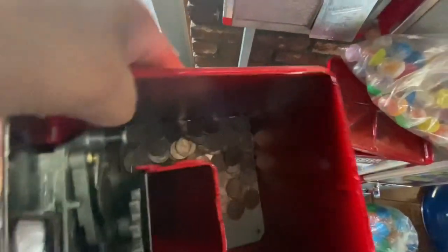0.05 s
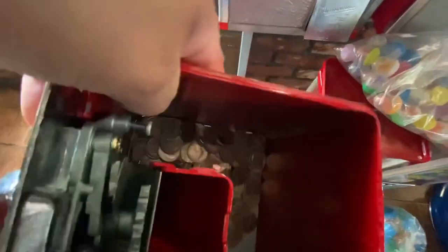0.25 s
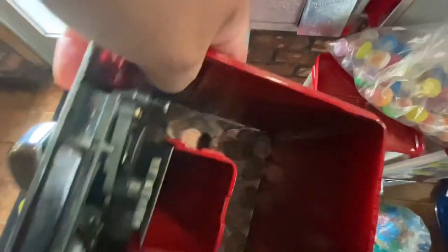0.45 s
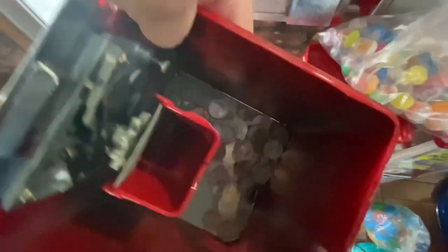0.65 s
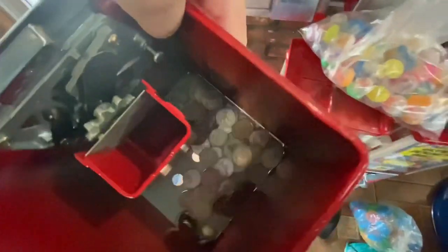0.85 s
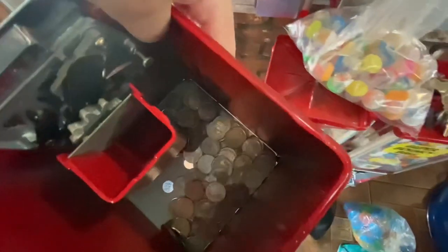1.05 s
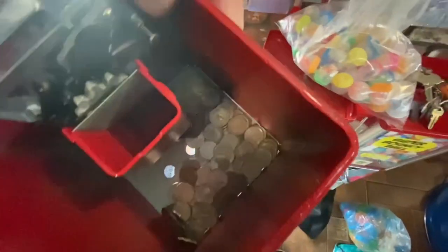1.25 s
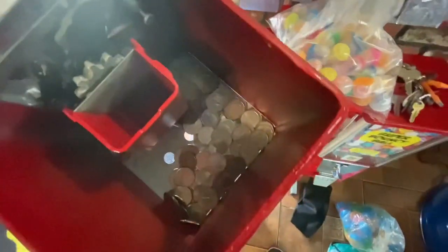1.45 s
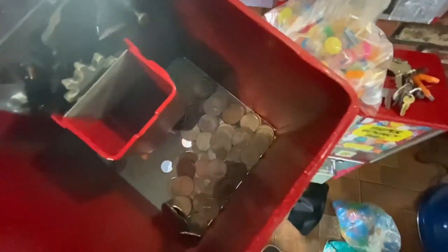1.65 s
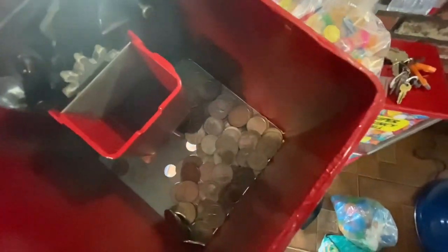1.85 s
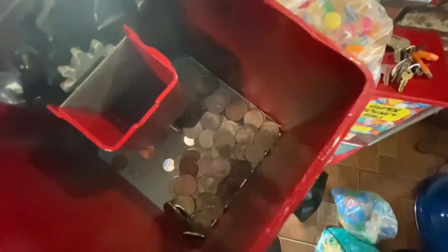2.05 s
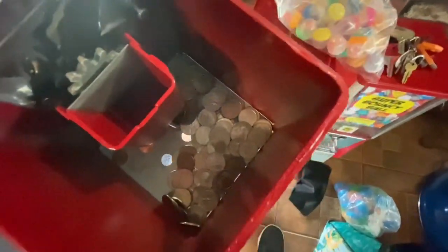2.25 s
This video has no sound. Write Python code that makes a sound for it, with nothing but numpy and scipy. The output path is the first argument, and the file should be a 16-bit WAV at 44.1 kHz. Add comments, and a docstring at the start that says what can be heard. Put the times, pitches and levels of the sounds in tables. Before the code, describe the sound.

Loose coins slide and jingle inside a tilted vending machine, then settle.

```python
"""A quiet, humming shop, close to a small vending machine that is being tilted.
Loose coins slide over its metal floor: many tiny touches blur into a scrape and a jingle.
They drop against the walls in quick knocks that ring the metal and boom in the plastic housing.
The coins settle after about a second, leaving the hum and a very faint, high rustle."""
import sys
import numpy as np
from scipy import signal
from scipy.fft import rfft, irfft
from scipy.io import wavfile

SR = 44100
rng = np.random.default_rng(int(sys.argv[2]) if len(sys.argv) > 2 else 0)


def wav_record(signal):
    """Record a signal, one row per channel, as 16-bit PCM in the file named by sys.argv[1]."""
    frames = np.transpose(np.atleast_2d(signal))
    bounded = np.clip(frames, -1, 1)
    # unit amplitude maps onto the largest positive 16-bit level
    quanta = np.round(bounded * 32767).astype(np.int16)
    wavfile.write(sys.argv[1], SR, quanta)


N = 101429

# tones of the appliance hum: pitch_hz, level_db
HUM_TONES = [(59.2, -53), (150.7, -66), (258.4, -66.5)]
# how the hum swells and dips: time_s, gain_db
HUM_SWELL = [(0, 4.5), (.4, 5), (.62, -3), (.8, -10), (.95, 0), (1.9, 3.5), (2.3, -2.5)]
# tone colour of the shop's dull noise: pitch_hz, gain_db
AIR_COLOUR = [(15, -34.5), (25, -8.5), (63, -3), (82, -6), (114, -14), (157, -13.5), (200, -13.5),
              (256, -10.5), (326, -17.5), (677, -18.5), (1040, -28), (2690, -35), (5570, -48),
              (6560, -46), (16000, -68)]
# how that noise swells and dips: time_s, gain_db
AIR_SWELL = [(0, 4.5), (.4, 4.5), (.7, -5.5), (1.0, 1), (1.3, 0), (1.55, 2), (1.8, 0.5), (2.05, 2),
             (2.3, 1)]
# how alike the background is on the left and right: pitch_hz, likeness_0_to_1
AIR_LIKENESS = [(50, 0.78), (200, 0.65), (600, 0.19), (1500, 0.199), (16000, .1)]
# loudness of the rustle: time_s, level_db
RUSTLE_LEVEL = [(1.2, -105), (1.42, -102), (1.52, -87.5), (1.62, -100), (1.88, -102), (1.98, -78.5),
                (2.1, -80), (2.3, -84)]
# tone colour of the rustle: pitch_hz, gain_db
RUSTLE_COLOUR = [(3000, -20), (4500, -10), (6700, -4.5), (7800, -11), (8900, 3.5), (9600, -5.5), (10800, 2),
                 (12500, -16), (16000, -28.5)]
# the room's echo (a fade is the time to drop by 60 dB): pitch_hz, fade_s
ROOM_FADE = [(100, .35), (500, .34), (3000, .3), (8000, .2), (16000, 0.074)]
# how much louder the coins are on the left: pitch_hz, left_minus_right_db
LEFT_LOUDER = [(100, 4), (400, 12.5), (650, 1), (1100, 7), (2200, -3), (3100, 4), (5200, 0), (7000, 3),
               (9600, -4.5), (12000, 0.5), (15000, 0)]
# how far the left wave runs ahead of the right: pitch_hz, lead_radians
LEFT_LEAD = [(0, 0), (420, .6), (700, 1.4), (1000, 3), (1900, 3.9), (2300, 6.4), (3200, 8.1), (3800, 11),
             (5050, 13.6), (5800, 17.6), (7300, 20.2), (10000, 19), (11700, 18.7), (12900, 15.7),
             (14000, 15.7), (15000, 19)]
# low tones of the plastic housing: pitch_hz, gain_db, fade_s
HOUSING_TONES = [(439.4, -5, 0.044), (540, -23.5, .04), (544.7, -0.5, 0.037), (612, -5.5, 0.015),
                 (666, 0.5, 0.028), (693, -12.5, .035), (1158, -5.5, 0.05)]
# rings of the metal floor and inner parts: pitch_hz, width_hz, gain_db
FLOOR_RINGS = [(1160, 60, 3), (1570, 90, 0), (1820, 50, 0), (2090, 90, 3), (2480, 60, 0), (2895, 50, 6),
               (3088, 45, 7), (3252, 28, 11), (3820, 60, 1), (4128, 35, 8), (4272, 30, 5), (4372, 25, 7),
               (4550, 70, 3), (4955, 55, 13), (5075, 55, 11), (5680, 70, 8), (5790, 50, 4), (6340, 60, 3),
               (7243, 35, 11), (7870, 70, 2), (8160, 40, 2), (9805, 40, 4), (10264, 40, 5), (10400, 50, 3),
               (10970, 40, 3), (12620, 35, 5), (15235, 40, 2)]
# tones of a ringing coin: pitch_hz, gain_db, fade_s
COIN_TONES = [(9200, -17, .12), (9590, -11.5, 0.052), (10260, -1.5, .16), (11170, -8.5, .15),
              (11680, -3, 0.1285), (12250, -6, .12), (15235, 10, .14), (15700, 8, .14)]
# overall tone colour of the coin clatter as heard, with a dip near 14 kHz: pitch_hz, gain_db
CLATTER_COLOUR = [(100, -19), (300, -20.5), (450, -9.5), (800, 4.5), (950, -0.5), (1400, 1.5), (2500, -1),
                  (4400, -1.5), (6000, -4.5), (8500, -6.5), (10300, 0.5), (12200, -0.5), (13000, -7),
                  (14000, -12.5), (15000, -7), (16000, -3.5)]
# how alike a touch's noise is on the left and right: pitch_hz, likeness_0_to_1
TOUCH_LIKENESS = [(100, 1), (700, 1), (1500, 0.5), (5000, 0.22), (8500, 1), (10500, 0.75), (16000, 0.43)]
# borders between the knock, clack, chink and sparkle bands: pitch_hz
BAND_EDGES_HZ = [1900, 3500, 8000]
# strength of the sliding heap: time_s, scrape_db, jingle_db
SLIDE_LEVELS = [(0, -53.5, -68.5), (0.102, -55.5, -69.5), (0.241, -32, -38), (0.272, -30.5, -34.5),
                (0.315, -31, -39), (0.383, -35, -36), (0.47, -29, -28.5), (0.53, -25.5, -28.5),
                (0.595, -30.5, -32), (0.637, -23, -34), (0.688, -36, -39), (0.73, -32.5, -36.5),
                (0.825, -43, -49.5), (0.9, -39, -44), (0.964, -44.5, -48.5), (1.035, -54.5, -61.5),
                (1.11, -45, -64), (1.15, -89, -126), (1.2, -59, -77)]
# coins hitting the walls: start_s, contact_s, thud_db, knock_db, clack_db, chink_db, sparkle_db
KNOCKS = [(0.012, 0.0046, -56.5, -47.5, -40.5, -54.5, -70.5), (0.028, 0.0043, -46, -43, -34.5, -41, -60),
          (0.039, 0.004, -54.5, -40, -47, -61.5, -55), (0.122, 0.004, -57, -51, -56, -60, -45),
          (0.171, 0.004, -58, -42, -41, -45.5, -42.5), (0.1995, 0.004, -32, -38.5, -23.5, -27.5, -41.5),
          (0.2192, 0.0071, -21.5, -23.5, -20.5, -18, -19.5), (0.264, 0.004, -44, -43.5, -43, -41.5, -24),
          (0.273, 0.004, -50, -41.5, -46, -38.5, -30), (0.288, 0.0069, -31, -28.5, -23.5, -20, -19),
          (0.334, 0.0037, -44, -34.5, -39.5, -31, -28), (0.3537, 0.012, -24.5, -28.5, -20, -15.5, -17.5),
          (0.363, 0.004, -20.5, -24.5, -38.5, -31, -32.5), (0.4235, 0.0051, -27, -29, -22.5, -21.5, -23.5),
          (0.428, 0.004, -26.5, -39, -29, -20.5, -21), (0.463, 0.004, -29, -37, -38.5, -25, -48),
          (0.483, 0.004, -42.5, -33.5, -36, -38, -27.5), (0.495, 0.012, -26, -48.5, -30, -21, -37.5),
          (0.511, 0.004, -40, -45, -27.5, -18.5, -39), (0.546, 0.0025, -26, -49, -24, -24.5, -28.5),
          (0.562, 0.004, -21, -47.5, -43.5, -18, -19), (0.6125, 0.0033, -26, -43, -24.5, -18.5, -16.5),
          (0.625, 0.004, -37, -58, -41.5, -28, -33), (0.639, 0.0061, -29.5, -41, -33, -21.5, -19.5),
          (0.652, 0.0067, -30, -32, -25.5, -19, -24), (0.658, 0.0045, -30, -44, -47, -25.5, -24.5),
          (0.715, 0.004, -49.5, -50, -35.5, -31, -26.5), (0.741, 0.004, -38.5, -63.5, -43.5, -34.5, -43),
          (0.775, 0.004, -47, -43, -34, -34, -32), (0.788, 0.0059, -34, -49.5, -33.5, -29, -44),
          (0.798, 0.0057, -44, -49.5, -39, -36, -35), (0.844, 0.004, -43.5, -46.5, -41.5, -42, -52),
          (0.883, 0.0034, -41, -47.5, -43, -37.5, -35), (0.921, 0.0056, -31, -39.5, -32.5, -29, -44),
          (0.952, 0.004, -53.5, -62, -47, -65, -35.5), (0.98, 0.0039, -49.5, -46.5, -42.5, -60, -56),
          (1.013, 0.004, -55, -54, -49, -61, -51), (1.051, 0.004, -48.5, -55, -49, -40, -39),
          (1.085, 0.0045, -57.5, -51, -55, -45.5, -35), (1.102, 0.0024, -49.5, -60, -48, -64, -39),
          (1.121, 0.0057, -56, -49.5, -45.5, -40, -39), (1.129, 0.0021, -66, -62, -47, -45, -57),
          (1.161, 0.0046, -60, -72, -50, -69, -82)]


def amp(db):
    """Turns decibels into a number to multiply by."""
    return 10 ** (np.asarray(db) / 20)


def unit(x):
    """Scales a sound to an average strength (rms) of 1."""
    return x / np.sqrt(np.mean(x ** 2) + 1e-20)


def read(points, hz):
    """Looks up a table by pitch, gliding between its rows."""
    pitch, value = np.transpose(points)
    return np.interp(np.log(hz + 1), np.log(pitch + 1), value)


def add(mix, start_s, sound):
    """Mixes a sound in at its start time."""
    part = mix[:, max(round(start_s * SR), 0):][:, :sound.shape[-1]]
    part += sound[..., :part.shape[-1]]


def noise(size, likeness):
    """Hiss that is partly alike on the left and right."""
    left, other = rfft(rng.standard_normal((2, size)))
    alike = np.clip(read(likeness, np.fft.rfftfreq(size, 1 / SR)), 0, 1)
    return irfft(np.array([left, alike * left + np.sqrt(1 - alike ** 2) * other]), size)


def coloured(x, colour):
    """Gives a scene-long noise a tone colour, at strength 1."""
    return unit(irfft(rfft(x) * amp(read(colour, np.fft.rfftfreq(N, 1 / SR))), N))


def ring(x, response):
    """Plays a sound through an object, given how that object answers a click."""
    return signal.fftconvolve(np.atleast_2d(x), np.atleast_2d(response), axes=1)[:, :x.shape[-1]]


def fading_tones(table, t, spread_db, detune=.012):
    """The tones of a struck object, each a little off in pitch and strength."""
    hz, db, fade_s = np.transpose(table)[:, :, None]
    pitch_luck, level_luck = rng.standard_normal((2, len(table), 1))
    level = amp(db + spread_db * level_luck - 60 * t / fade_s)
    return level * np.sin(2 * np.pi * hz * (1 + detune * pitch_luck) * t)


def shop(waver_depth=.16, air_db=-54.5):
    """An appliance hums, wavering slightly, over dull room noise."""
    t = np.arange(N) / SR

    def waver():
        waves = [np.cos(2 * np.pi * (hz * t + rng.random())) / np.sqrt(hz)
                 for hz in rng.uniform(1, 9, 12)]
        return waver_depth * unit(sum(waves))

    hum = sum(amp(db) * np.sqrt(2) * (1 + waver()) * np.sin(2 * np.pi * hz * t + waver())
              for hz, db in HUM_TONES)
    hum *= amp(np.interp(t, *np.transpose(HUM_SWELL)))
    air = coloured(noise(N, AIR_LIKENESS), AIR_COLOUR)
    return hum + air * amp(air_db + np.interp(t, *np.transpose(AIR_SWELL)))


def rustle():
    """A very faint, high hiss whose level flickers, making it grainy."""
    grains = noise(N, AIR_LIKENESS) * amp(2 * np.repeat(rng.standard_normal(N // 200 + 1), 200)[:N])
    level = amp(np.interp(np.arange(N) / SR, *np.transpose(RUSTLE_LEVEL)))
    return coloured(grains, RUSTLE_COLOUR) * level


def room_echo(x, level_db=-20, rise_s=.012):
    """The room adds a short wash of echo that dies faster in the treble."""
    hz, t, hiss = signal.stft(rng.standard_normal((2, SR // 2)), SR, nperseg=256)
    fade = amp(-60 * t / read(ROOM_FADE, hz)[:, None])
    tail = signal.istft(hiss * fade * np.minimum(t / rise_s, 1), SR, nperseg=256)[1]
    return amp(level_db) * ring(x, tail / np.linalg.norm(tail[0]))


def place_left(x):
    """The coins lie nearer the left, so each pitch differs in level and timing between the sides."""
    hz = np.fft.rfftfreq(2 * N, 1 / SR)
    side = amp(read(LEFT_LOUDER, hz) / 2) * np.exp(.5j * np.interp(hz, *np.transpose(LEFT_LEAD)))
    return irfft(rfft(x, 2 * N) * np.array([side, 1 / side]))[:, :N]


def housing_thud(t, pitch_shift=.032, rise_s=.0019):
    """The hollow housing booms, its pitch set by the random spot where a coin lands."""
    signs = (-1) ** (np.arange(len(HOUSING_TONES)) // 2)
    tones = fading_tones(HOUSING_TONES, t * (1 + pitch_shift * rng.uniform(-1, 1)), spread_db=2.5)
    return (signs[:, None] * tones).sum(0) * (1 - np.exp(-t / rise_s))


def floor_bands(ring_db, size, ripple_db=3.2, ripple_hz=22):
    """How a click on the metal floor is heard, in four bands: knock, clack, chink and sparkle."""
    hz = abs(np.fft.fftfreq(size, 1 / SR))
    grid = np.arange(0, SR, ripple_hz)
    weak_rings = amp(ripple_db * np.interp(hz, grid, np.clip(rng.standard_normal(len(grid)), -2, 2)))
    strong_rings = sum(amp(db + ring_db) ** 2 / (1 + (2 * (hz - pitch) / width) ** 2)
                       for pitch, width, db in FLOOR_RINGS)
    gain = amp(read(CLATTER_COLOUR, hz)) * np.sqrt(weak_rings ** 2 + strong_rings)
    below = [0 * hz] + [1 / (1 + (hz / edge) ** 12) for edge in BAND_EDGES_HZ] + [1 + 0 * hz]
    log_gain = np.log(gain * np.sqrt(abs(np.diff(below, axis=0))) + 1e-4)
    # this step makes the ringing come after the click, never before it
    return np.fft.ifft(np.exp(np.conj(signal.hilbert(log_gain)))).real[:, :size // 2]


def coin_ring(t):
    """One struck coin rings with very high tones."""
    return unit(fading_tones(COIN_TONES, t, spread_db=7).sum(0)) / np.sqrt(len(t))


def coin_clink(t, low_hz=2679, high_hz=6816, fade_s=.065):
    """A coin lying on others is half muffled: three short tones that depend on how it lies."""
    hz = low_hz * (high_hz / low_hz) ** rng.random((3, 1))
    return unit(np.sin(2 * np.pi * hz * t).sum(0) * amp(-60 * t / fade_s)) / np.sqrt(len(t))


def sliding_coins(coin_count=18, touches_per_s=1900, spread_db=4.5, tick_fade_s=.014):
    """Many coins tick against each other and the floor as the heap slips."""
    bands = floor_bands(ring_db=-5.5, size=8192)
    t, now = np.arange(SR // 5) / SR, np.arange(N) / SR
    times, *levels_db = np.transpose(SLIDE_LEVELS)
    scrape_level, jingle_level = (amp(np.interp(now, times, db, right=-120)) for db in levels_db)
    touching = rng.random(N) < touches_per_s / SR
    touches = unit(touching * amp(spread_db * np.minimum(rng.exponential(1, N), 3)))
    # five coins are active at a time, then their neighbours take over
    active_coin = (rng.integers(0, 5, N) + np.arange(N) // 900) % coin_count
    lower_bands = rfft(bands[:-1])  # joined into one for the scrape
    floor = irfft(np.sqrt((abs(lower_bands) ** 2).sum(0)) * np.exp(1j * np.angle(lower_bands.sum(0))))
    same_energy = lambda x: unit(x) / np.sqrt(2 * len(t))
    out = np.zeros((2, N))
    for coin in range(coin_count):
        tick = same_energy(noise(len(t), TOUCH_LIKENESS) * amp(-60 * t / tick_fade_s))
        scrape = same_energy(ring(tick + amp(-4.5) * coin_clink(t) / 2, floor)) * amp(-.5)
        scrape += same_energy(housing_thud(t)) * amp(-9)
        jingle = same_energy(ring(tick + amp(-5.5) * coin_ring(t) / 2, bands[-1])) * amp(4)
        for i in np.flatnonzero((active_coin == coin) * touches * (now < times[-1])):
            add(out, i / SR, touches[i] * (scrape_level[i] * scrape + jingle_level[i] * jingle))
    return out


def knocking_coins(rise_s=.00027, fade_s=.023, tail_fade_s=.13, thud_delay_s=.00069, hard_db=-19):
    """Coins land in a quick cluster of touches that rattles round the housing and sets it booming."""
    out, t = np.zeros((2, N)), np.arange(SR // 5) / SR
    same_attack = lambda x: x / np.sqrt(np.mean(x[..., :900] ** 2) * 4.5)  # set by the first 20 ms
    for start_s, contact_s, thud_db, *bands_db in KNOCKS:
        fade = amp(-60 * np.maximum(t - contact_s, 0) / fade_s)
        tail = amp(-20 - 60 * t / tail_fade_s)
        rattle = amp(2.5 * np.repeat(rng.standard_normal(len(t)), 24)[:len(t)])
        burst = noise(len(t), TOUCH_LIKENESS) * (fade + tail) * rattle * (1 - np.exp(-t / rise_s))
        ringing = (amp(-16.5) * coin_ring(t) + amp(-8) * coin_clink(t)) / 2
        snap = amp(-8) * (t == 0)
        burst += np.linalg.norm(burst[0]) * (ringing + snap)
        # the floor rings less after knocks with a softer chink
        bands = floor_bands(ring_db=1.5 + .3 * (bands_db[2] - hard_db), size=4096)
        for band, db in zip(bands, bands_db):
            add(out, start_s, amp(db + .5) * same_attack(ring(burst, band)))
        add(out, start_s + thud_delay_s, amp(thud_db + 1.5) * same_attack(housing_thud(t)))
    return out


def scene():
    """Mixes the coins, their echo, the shop and the rustle."""
    coins = place_left(knocking_coins() + sliding_coins())
    return coins + room_echo(coins) + shop() + rustle()


def record(dry, low_cut_hz=36, high_cut_hz=15760):
    """Takes away the deepest rumble and the highest treble."""
    dry = signal.sosfilt(signal.butter(4, low_cut_hz, "highpass", fs=SR, output="sos"), dry)
    treble_cut = signal.firwin(511, high_cut_hz, window=("kaiser", 9), fs=SR)
    return signal.oaconvolve(dry, treble_cut[None], "same")


dry = scene()
out = record(dry)
wav_record(out)
```